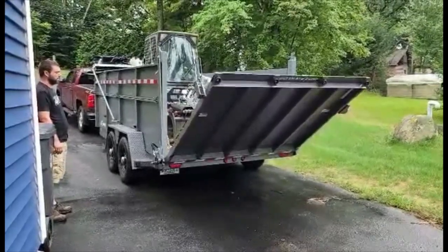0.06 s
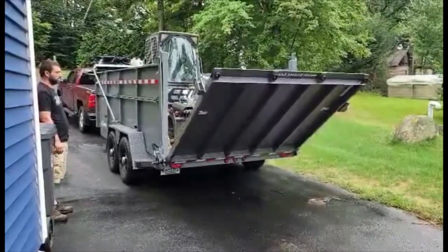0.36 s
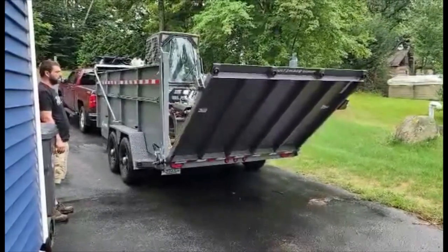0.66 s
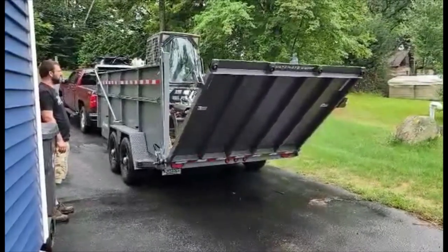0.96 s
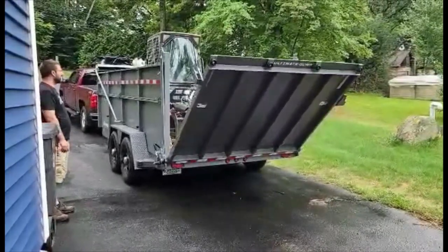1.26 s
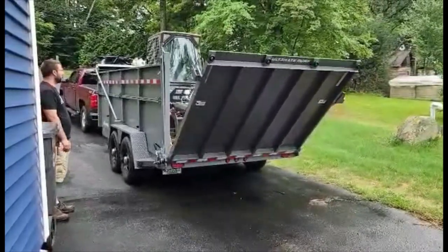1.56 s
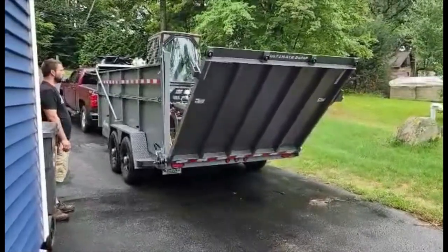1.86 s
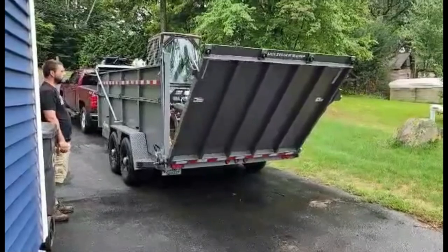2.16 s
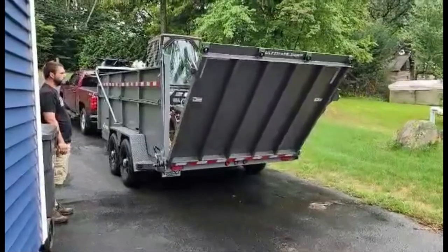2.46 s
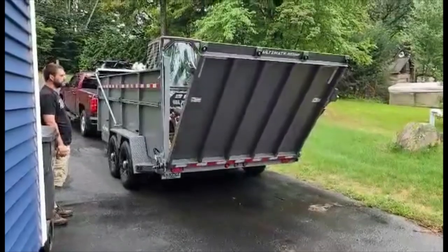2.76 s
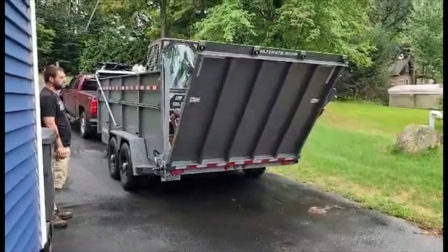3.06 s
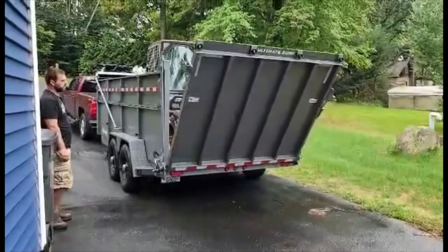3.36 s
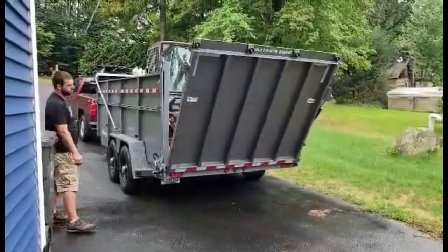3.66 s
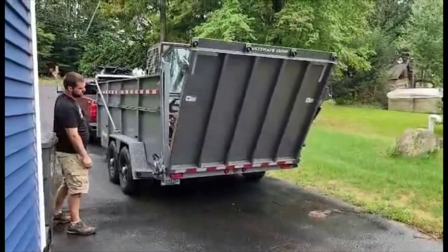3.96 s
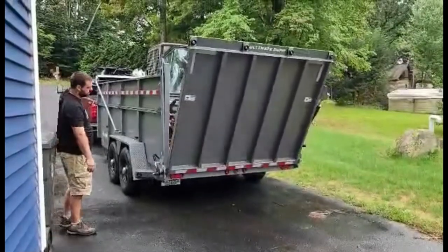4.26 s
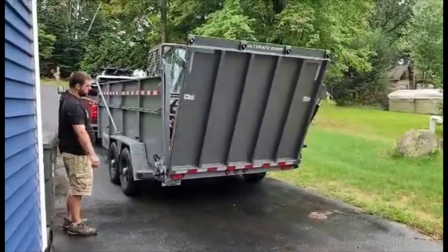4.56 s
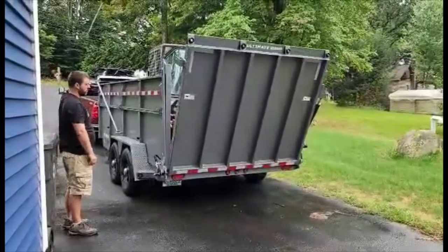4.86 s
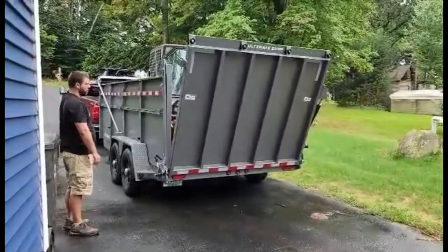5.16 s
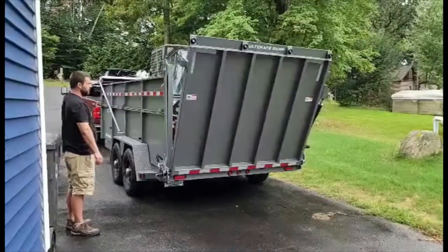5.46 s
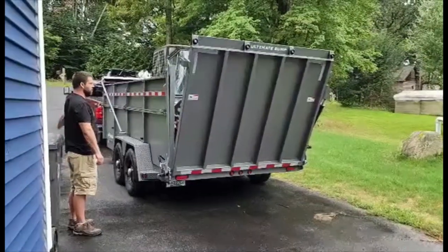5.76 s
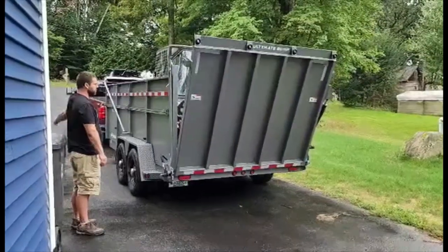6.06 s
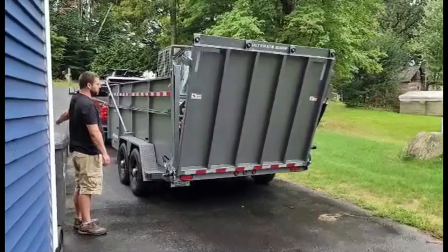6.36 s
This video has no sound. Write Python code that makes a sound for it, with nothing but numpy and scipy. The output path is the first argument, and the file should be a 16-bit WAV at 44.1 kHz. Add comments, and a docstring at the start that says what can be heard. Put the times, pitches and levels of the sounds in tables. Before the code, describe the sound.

An electric hydraulic pump whines over a hiss of oil, creeping up in pitch as it lifts a steel trailer gate a few metres away. The hinges snap and crackle under strain. The gate shuts with a loud boom, and the steel body rings and rattles lightly. The motor winds down, then restarts with a softer thud. Insects shrill in the trees over a growing outdoor rumble and wash.

```python
"""A driveway, where an electric hydraulic pump lifts the steel gate of a dump trailer a few metres off.
Gear teeth and motor slots whine over hissing oil, creeping up in pitch as the load eases, and the hinges
snap under strain. The gate booms shut and sets the steel body ringing; the motor coasts, then starts
again with a thud. Insects shrill in the trees over an outdoor rumble and wash that grow toward the end."""
import sys
import numpy as np
from scipy import signal
from scipy.fft import rfft, irfft
from scipy.io import wavfile

SR = 44100
rng = np.random.default_rng(int(sys.argv[2]) if len(sys.argv) > 2 else 0)


def bounce(signal):
    """Save signal as a 16-bit WAV file at the path given by the first command-line argument."""
    frames = np.transpose(np.atleast_2d(signal))
    limited = np.clip(frames, -1, 1)
    pcm = np.round(limited * 32767).astype(np.int16)
    wavfile.write(sys.argv[1], SR, pcm)


N = 287091
T = np.arange(N) / SR
HZ = np.fft.rfftfreq(N, 1 / SR)

SHUT_S, RESTART_S = 4.76, 6.0  # the motor lifts until the gate shuts, coasts, and is switched on again
LIFT_HZ = 60.29  # shaft rate at the start of the lift
# Colour of the pump's hiss. Each row: frequency in Hz, density in dB per Hz.
HISS_SPECTRUM = [(400, -103), (1500, -91), (2300, -97), (3700, -101), (4400, -86.5), (5200, -103),
                 (7200, -82), (8600, -102), (10000, -121), (12800, -111)]
# The side the pump is heard from. Each row: frequency in Hz, left minus right in dB.
PUMP_PAN = [(500, 2), (1600, 0), (3200, -1), (4100, -4), (4800, -9), (5800, -7), (6500, -2), (7200, 7),
            (8200, 12), (9600, 10), (11500, 3), (12800, 8)]


def amp(db):
    """Decibels to gain."""
    return 10 ** (np.asarray(db) / 20)


def value_at(points, hz):
    """A table's value at hz, on a log-frequency axis."""
    f, value = np.transpose(points)
    return np.interp(np.log(hz + 1), np.log(f + 1), value)


def sides(pan_db):
    """Left and right gains of unit mean power; positive leans left."""
    pair = np.array([amp(pan_db / 2), amp(-pan_db / 2)]).reshape(2, -1)
    return pair / np.sqrt(np.mean(pair ** 2, axis=0))


def pan_by_frequency(x, pan):
    """Leans each frequency to its own side."""
    return irfft(rfft(x) * sides(value_at(pan, HZ)), N)


def add(mix, start_s, sound):
    """Mixes a stereo sound in at start_s."""
    part = mix[:, round(start_s * SR):][:, :sound.shape[1]]
    part += sound[:, :part.shape[1]]


def wander(rate_hz):
    """A slow random curve of unit spread."""
    count = 1000
    hz = np.fft.rfftfreq(count, N / SR / count)
    curve = irfft(rfft(rng.standard_normal(count)) / (1 + (hz / rate_hz) ** 2), count)
    return np.interp(T, np.linspace(0, T[-1], count), curve / curve.std())


def noise(spectrum, size=N, alike_hz=750):
    """Stereo noise of a given density; long waves reach left and right alike."""
    hz = np.fft.rfftfreq(size, 1 / SR)
    mid, side = rfft(rng.standard_normal((2, size)))
    width = np.arctan(hz / alike_hz) / 2
    mid, side = mid * np.cos(width), side * np.sin(width)
    pair = np.array([mid + side, mid - side])
    return irfft(pair * amp(value_at(spectrum, hz)) * np.sqrt(SR / 2), size)


def shaft_rate():
    """Turns per second: a slow climb as the load eases, a coast after the gate shuts, a quick spin-up."""
    climb_hz_per_s, easing_hz_per_s2, rerun_hz = .29, .029, 61.3
    coast_s, spin_up_s = 1.0, 0.072  # time constants
    lifted_s = np.minimum(T, SHUT_S)
    lifting = LIFT_HZ + climb_hz_per_s * lifted_s + easing_hz_per_s2 * lifted_s ** 2
    coasting = np.exp(-(T - lifted_s) / coast_s)
    rerun = rerun_hz * (1 - np.exp(-np.maximum(T - RESTART_S, 0) / spin_up_s))
    return np.maximum(lifting * coasting, rerun)


def rasp(shaft):
    """Gears and brushes scrape alike on every turn; the pattern drifts slowly."""
    turn_size, steps = round(SR / LIFT_HZ), 32768
    position = (shaft / (2 * np.pi) * steps).astype(int) % steps
    layers = []
    for _ in range(3):
        one_turn = signal.resample(noise(HISS_SPECTRUM, size=turn_size), steps, axis=1)
        layers.append(one_turn[:, position] * wander(rate_hz=0.97))
    return sum(layers) / np.sqrt(len(layers))


def pump_hiss(shaft, speed):
    """Oil and brushes hiss with speed, easing off as the gate nears upright."""
    start_db, ease_db_per_s = 0.6, -0.24
    rasp_share = .45  # share of the power that repeats with every turn
    effort = (speed / speed.max()) ** 3 * amp(start_db + ease_db_per_s * np.minimum(T, SHUT_S))
    friction = np.sqrt(1 - rasp_share) * noise(HISS_SPECTRUM) + np.sqrt(rasp_share) * rasp(shaft)
    return pan_by_frequency(friction, PUMP_PAN) * effort * (1 + 0.1 * np.cos(shaft))


def partial_gain(order, db, swells=()):
    """Left and right gain of a whine partial: its base level joined by bell-shaped swells."""
    power = (amp(db) * sides(value_at(PUMP_PAN, order * LIFT_HZ))) ** 2
    for peak_s, half_s, swell_db, pan_db in swells:
        bell = np.exp(-((T - peak_s) / half_s) ** 2)
        power = power + (amp(swell_db) * sides(pan_db) * bell) ** 2
    return np.sqrt(power)


def partial(angle, hz, scatter, rough=0):
    """One tone of the whine: direct wave plus drifting reflections (scatter), fluttering if rough."""
    # How far the whine arrives on the left ahead of the right. Each row: frequency in Hz, lead in radians.
    left_lead = [(550, 0), (800, .55), (1600, 1.7), (1750, 1.9), (2400, 5.7), (4000, 6.6), (4800, 6.9),
                 (7200, 13.2), (13000, 19.5)]
    lead = value_at(left_lead, hz) / 2
    direct = np.exp([[1j * lead], [-1j * lead]])
    drift = np.array([wander(rate_hz=1.5) + 1j * wander(rate_hz=1.5) for _ in range(2)]) / np.sqrt(2)
    paths = (direct + scatter * drift) / np.sqrt(1 + scatter ** 2)
    if rough:
        flutter = wander(rate_hz=45) + 1j * wander(rate_hz=45)
        paths = paths * (1 + rough * flutter) / np.sqrt(1 + 2 * rough ** 2)
    return np.sqrt(2) * (paths * np.exp(1j * angle)).real


def pump_whine(shaft, speed):
    """Gear teeth and motor slots sing on multiples (orders) of the shaft rate."""
    # Level ride of the gear-tooth tone. Each row: time in seconds, level in dB at full speed.
    tooth_levels = [(0, -56), (.7, -41.5), (1.2, -39.5), (2.1, -41.5), (2.75, -47.5), (3.2, -46.5),
                    (3.75, -60.5), (4.7, -53.5), (6.17, -49), (6.23, -44), (6.32, -49), (6.4, -43),
                    (6.5, -61)]
    # Strong partials, swelling as the speed changes and the echo off the moving gate falls into step.
    # Each row: order, base level in dB, roughness from 0 to 1, swells.
    # Each swell: peak time in seconds, half-length in seconds, level in dB, left minus right in dB.
    strong_partials = [dict(order=9, db=-67.5, rough=0.15, swells=[(1.8, 0.49, -60.5, 7),
                       (2.95, 0.55, -57, 7), (4.1, 0.53, -59.5, 11)]),
                       dict(order=26, db=-58.5, rough=0.33, swells=[(.55, 0.62, -52, -13),
                       (1.8, 0.52, -46.5, 19), (3.4, 0.42, -57, 10), (4.35, 0.38, -45.5, -7),
                       (6.25, 0.087, -44, -2), (6.43, .06, -43.5, 0)]),
                       dict(order=27, db=-55, rough=0.31, swells=[(.2, 0.37, -47.5, 2), (.7, .2, -57, -14),
                       (1.25, 0.46, -49.5, 8), (1.8, 0.35, -46.5, -12), (2.45, 0.53, -49, -6),
                       (3.2, 0.28, -60, -14), (4.7, 0.22, -54, 11), (6.23, 0.026, -45, 0)]),
                       dict(order=28, db=-63.5, rough=.4, swells=[(1.5, 0.67, -55, 8),
                       (3.75, .3, -53.5, -3)]),
                       dict(order=39, db=-62.5, rough=0.17, swells=[(.15, 0.98, -53.5, -12),
                       (1.3, 0.54, -50.5, -4), (2.65, 0.49, -55, 3), (3.25, 0.42, -52, 6),
                       (4.7, 0.18, -55, -18)]),
                       dict(order=52, db=-68, rough=0.19, swells=[(.25, 0.76, -63.5, -6),
                       (1.85, .2, -59.5, -1), (3, 0.45, -59, -2), (3.7, 0.18, -63.5, 2)]),
                       dict(order=65, db=-63.5, rough=0.26, swells=[(1.45, 0.86, -65, 14),
                       (2.3, 0.28, -51, -9), (2.85, 0.25, -51.5, -15), (3.68, 0.22, -51, -15)]),
                       dict(order=78, db=-65.5, rough=0.11, swells=[(1.55, 0.21, -61, -16),
                       (2.6, .3, -64, -13), (3.35, 0.4, -60.5, -12), (4.55, 0.22, -59, -12)]),
                       dict(order=91, db=-59, rough=.1, swells=[(2.3, 0.88, -51, -14)]),
                       dict(order=117, db=-65, rough=0.3, swells=[(.35, 0.29, -51, 6),
                       (2.95, 0.2, -51.5, 5), (3.3, .18, -53, 14), (3.9, 0.18, -54, 14),
                       (4.25, .16, -53, 7)]), dict(order=130, db=-67, rough=.1, swells=[(.6, .4, -57, 18)]),
                       dict(order=143, db=-68, rough=0.16, swells=[(.05, .15, -65, 15), (1, .25, -65, 15),
                       (2.75, 0.41, -63.5, 15), (3.8, 0.5, -64.5, 18)]),
                       dict(order=156, db=-79, rough=0.12, swells=[(.3, .3, -71, 12), (2.4, .25, -69, 12),
                       (3.3, 0.26, -70, 12), (4.1, 0.17, -70, 12)]),
                       dict(order=208, db=-78, rough=0.2, swells=[(2.6, 0.58, -68.5, 12),
                       (3.45, 0.38, -68, 15), (4.2, .2, -69, 12)])]
    # Weak partials without swells. Each row: order, level in dB before the trim.
    weak_partials = [(5, -70), (7, -71), (11, -70), (22, -70), (24, -67), (54, -70), (58, -72), (66, -68),
                     (81, -71), (82, -71), (104, -58), (182, -79), (195, -79)]
    teeth, top_hz, restarted = 13, speed.max(), T > RESTART_S
    strong_scatter, weak_scatter, weak_trim_db = 0.4, 1, 0.75
    fade_db_per_halving, unload_db_per_s, dull_db_per_octave2 = -20, -220, -0.5
    tooth_db = np.interp(T, *np.transpose(tooth_levels))
    whine = partial_gain(teeth, tooth_db) * partial(teeth * shaft, teeth * top_hz, scatter=0.18)
    voices = [(p["order"], p["db"], p["swells"], strong_scatter, p["rough"]) for p in strong_partials]
    voices += [(order, db + weak_trim_db, (), weak_scatter, 0) for order, db in weak_partials]
    for order, db, swells, scatter, rough in voices:
        # after the restart, partials far from the tooth tone are softer
        dulling = amp(dull_db_per_octave2 * np.log2(order / teeth) ** 2 * restarted)
        tone = partial(order * shaft, order * top_hz, scatter, rough)
        whine += partial_gain(order, db, swells) * dulling * tone
    # the whine fades as the motor slows, and dies once the shut gate takes the load
    unloaded_s = np.where(restarted, 0, np.maximum(T - SHUT_S, 0))
    return whine * amp(fade_db_per_halving * np.log2(top_hz / speed) + unload_db_per_s * unloaded_s)


def pump():
    """One shaft drives hiss and whine; it turns evenly on the lift and judders once the load changes."""
    speed = shaft_rate()
    judder = np.interp(T, [SHUT_S, SHUT_S + .1], [.0006, .01]) * wander(rate_hz=30)
    shaft = 2 * np.pi * np.cumsum(speed * (1 + judder)) / SR
    return pump_hiss(shaft, speed) + pump_whine(shaft, speed)


def outdoor_background():
    """A broad wash grows louder toward the end; an uneven distant rumble follows it a little."""
    # Colours of the rumble and the wash. Each row: frequency in Hz, density in dB per Hz before the swell.
    rumble_spectrum = [(10, -89), (22, -73), (32, -69), (58, -61.5), (100, -64), (150, -76), (250, -81.5),
                       (450, -102), (1500, -115)]
    wash_spectrum = [(60, -74), (300, -83), (500, -88.5), (900, -84), (1500, -86.5), (2600, -92.5),
                     (3400, -96), (5000, -97), (7000, -104), (10000, -121), (12000, -112), (13000, -114)]
    # Level ride of the outdoor background. Each row: time in seconds, gain in dB.
    background_swell = [(0, 1), (1.2, -0.2), (2, 2), (4, 2.5), (6, 8), (6.25, 10), (6.51, 8.5)]
    swell_db = np.interp(T, *np.transpose(background_swell))
    rumble = noise(rumble_spectrum) * amp(0.18 * swell_db + wander(rate_hz=8))
    wash = noise(wash_spectrum) * amp(swell_db + .5 * wander(rate_hz=8.2))
    return rumble + wash * sides(pan_db=-3.0)


def insects():
    """A chorus in the trees to the right: a shrill, narrow band that flickers slightly."""
    # Colour of the chorus. Each row: frequency in Hz, density in dB per Hz.
    chorus_spectrum = [(3500, -120), (5200, -99), (5600, -77.5), (6250, -72), (6600, -77.5), (7000, -104.5),
                       (9000, -125)]
    return noise(chorus_spectrum) * amp(1.06 * wander(rate_hz=33)) * sides(pan_db=-7.0)


def snap(db, t60, tilt_db_per_octave, rise_s=0.0015, pivot_hz=5000):
    """A slip in a steel joint: a sharp burst of dense, quickly damped ringing, and the hinge's modes."""
    # Colour of the burst before its tilt. Each row: frequency in Hz, density in dB per Hz.
    burst_spectrum = [(200, -72), (900, -76), (1200, -75), (2000, -63), (3200, -63), (4300, -54),
                      (4700, -56.5), (5300, -52.5), (6000, -54.5), (7200, -65), (9200, -66.5),
                      (10000, -79.5), (11800, -67.5), (13200, -96)]
    # The hinge's own modes. Each row: frequency in Hz, relative level in dB.
    hinge_modes = [(870, -38), (1250, -38), (1500, -37), (1980, -35), (2750, -31), (4740, -26), (5650, -31),
                   (9250, -45), (11800, -47)]
    size = 8192
    t, hz = T[:size], np.fft.rfftfreq(size, 1 / SR)
    burst = noise(burst_spectrum, size=size)
    for mode_hz, mode_db in hinge_modes:
        burst += amp(mode_db) * np.sin(2 * np.pi * mode_hz * t + rng.uniform(0, 2 * np.pi, (2, 1)))
    tilt = amp(tilt_db_per_octave * np.log2(np.maximum(hz, 1500) / pivot_hz))
    envelope = amp(db - 60 * t / t60) * (1 - np.exp(-t / rise_s))
    return irfft(rfft(burst) * tilt) * envelope


def joints():
    """The hinges snap and crackle under load; loose fittings rattle after the gate shuts."""
    # Hinge snaps. Each row: start in seconds, gain in dB, t60 in seconds, brightness in dB per octave.
    hinge_snaps = [(1.719, -19.5, 0.079, -10), (1.767, -23, 0.07, -12), (1.9336, -1, 0.07, 0),
                   (1.9456, 5.5, 0.027, 1), (1.951, -1.5, 0.076, 0.5), (2.0258, -15.5, 0.14, -5),
                   (2.157, -14.5, 0.11, -3), (2.262, -20.5, 0.07, -7), (2.38, -6, 0.043, -4.5),
                   (2.464, -12, 0.12, -4.5), (2.4934, 5.5, 0.024, 3), (2.5, -3, 0.035, -.5),
                   (2.518, -20.5, 0.085, -7), (2.568, -20.5, 0.12, -7.5), (2.645, -27.5, 0.072, -8),
                   (2.708, -18, 0.055, -5)]
    # Light metallic rattles. Each row: start in seconds, gain in dB.
    rattles = [(4.974, -17.5), (4.99, -20), (5.152, -23.5), (5.265, -29)]
    # The side the joints are heard from. Each row: frequency in Hz, left minus right in dB.
    joint_pan = [(600, -8), (2000, 3.5), (4000, -8.5), (7200, 1.5), (11000, 2.5)]
    strain_from_s, strain_to_s, crackle_count, crackle_db = 1.7, 2.74, 24, -20.5
    out = np.zeros((2, N))
    for start_s, db, t60, brightness in hinge_snaps:
        add(out, start_s, snap(db, t60, brightness))
    for when, weaker in rng.random((crackle_count, 2)):
        start_s = strain_from_s + when * (strain_to_s - strain_from_s)
        add(out, start_s, snap(crackle_db - 10 * weaker, t60=0.023, tilt_db_per_octave=-8))
    for start_s, db in rattles:
        add(out, start_s, snap(db, t60=0.15, tilt_db_per_octave=5.5, rise_s=0.013))
    return pan_by_frequency(out, joint_pan)


def yard_echoes(x, wet_db=-18, t60=.4, echoes_per_s=2000, predelay_s=.008):
    """Adds faint scattered echoes from the house wall and the trees."""
    t = T[:SR // 2]
    taps = rng.standard_normal((2, len(t))) * (rng.random((2, len(t))) < echoes_per_s / SR)
    taps *= (t > predelay_s) * amp(-60 * t / t60)
    return x + amp(wet_db) * signal.fftconvolve(x, taps / np.linalg.norm(taps[0]), axes=1)[:, :N]


def body_ring(push_db=-13, push_hz=75, push_t60=0.052, rise_s=0.00072):
    """The trailer's steel rings from one blow; each point of contact mixes the modes anew."""
    # The crowd of weak panel modes. Each row: frequency in Hz, density in dB per Hz, t60 in seconds.
    panel_modes = [(20, -82, 1.7), (49, -37, 1.9), (120, -48.5, 2.37), (326, -56.5, 1.68),
                   (484, -69.5, 1.7), (800, -63, 1.44), (1150, -71.5, 0.74), (2130, -76, 0.95),
                   (3460, -69.5, 0.42), (6000, -70, 0.23), (9800, -105, .1)]
    # The strongest modes. Each row: frequency in Hz, level in dB before the trim, t60 in seconds.
    body_modes = [(34, -23, 1.4), (54, -28, 1.6), (85, -30, 1.1), (110, -27, 1.1), (150, -38, .7),
                  (215, -26, .8), (238, -26, .55), (265, -28, .4), (291, -27, .65), (336, -28, .75),
                  (598, -42, 1.9), (765, -36, .35), (800, -37, .45), (830, -35, .55), (867, -34, .45),
                  (920, -33, .2), (958, -45, .9), (1028, -44, .3), (1610, -44, .4), (1770, -41, .13),
                  (1850, -40, .13), (2010, -37, .14), (2150, -34, .14), (2870, -44, .15), (3400, -43, .15),
                  (4850, -42, .12)]
    trim_db, build_cycles = -2.5, 0.76  # a mode takes this many cycles to spread over the steel
    size = round(1.6 * SR)
    t, panels = T[:size], np.array(panel_modes)
    panel_spectrum, panel_t60 = panels[:, :2], panels[:, ::2]
    hz, frame_s, bands = signal.stft(noise(panel_spectrum, size=size), SR, nperseg=1024)
    decay = amp(-60 * frame_s / value_at(panel_t60, hz)[:, None])
    ring = signal.istft(bands * decay, SR, nperseg=1024)[1][:, :size]
    for mode_hz, db, t60 in body_modes:
        # a neighbouring panel beats against each mode, weaker and slightly off tune
        twin_hz = mode_hz + rng.uniform(-1, 1) * min(9, .12 * mode_hz)
        # higher modes reach left and right further out of step
        phase = mode_hz / 1500 * rng.standard_normal((2, 1))
        mode = np.sin(2 * np.pi * mode_hz * t + phase)
        twin = 0.42 * np.sin(2 * np.pi * (twin_hz * t + rng.random()) + phase)
        build = 1 - np.exp(-t * mode_hz / build_cycles)
        ring += amp(db + trim_db - 60 * t / t60) * build * (mode + twin)
    # the whole panel first shoves the air as one piece
    ring += amp(push_db - 60 * t / push_t60) * np.sin(2 * np.pi * push_hz * t)
    return ring * (1 - np.exp(-t / rise_s))


def trailer_blows():
    """The gate strikes the frame and rebounds; later the restarting pump jolts the bed, more softly."""
    # Blows on the steel. Each row: start in seconds, gain in dB, low and high edge of the band in Hz.
    blows = [(4.742, -2, 650, 2600), (4.7514, 2.5, 163, 2600), (4.7732, -4, 13, 400),
             (4.852, -7.5, 22, 1200), (4.939, -7.5, 15, 150), (4.985, -4.5, 610, 1270),
             (5.13, -17, 60, 905), (5.25, -18, 33, 508), (6.028, -10, 450, 800), (6.036, -8, 63, 169),
             (6.08, -4.5, 99, 135), (6.159, -11.5, 150, 220), (6.416, -14.5, 43, 129)]
    out = np.zeros((2, N))
    for start_s, db, low_hz, high_hz in blows:
        ring = signal.lfilter(*signal.butter(1, low_hz, "high", fs=SR), body_ring())
        ring = signal.lfilter(*signal.butter(2, high_hz, fs=SR), ring)
        add(out, start_s, amp(db) * ring)
    return out


def scene():
    """Pump, joints and trailer body in the open air, with insects behind."""
    return pump() + yard_echoes(joints()) + trailer_blows() + outdoor_background() + insects()


def record(dry, cutoff_hz=13150):
    """A steep low-pass takes off the highest treble."""
    lowpass = signal.firwin(511, cutoff_hz, window=("kaiser", 9), fs=SR)
    return signal.oaconvolve(dry, lowpass[None], "same")


dry = scene()
out = record(dry)
bounce(out)
```